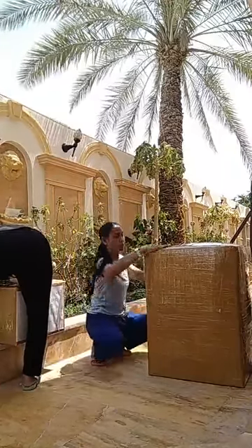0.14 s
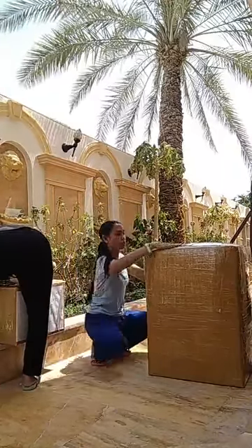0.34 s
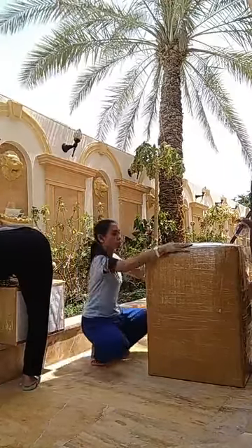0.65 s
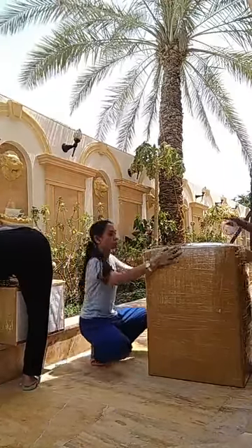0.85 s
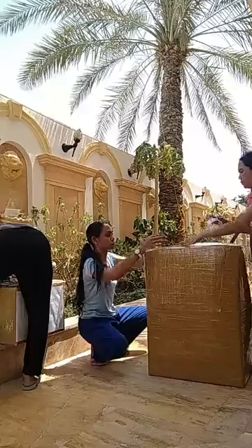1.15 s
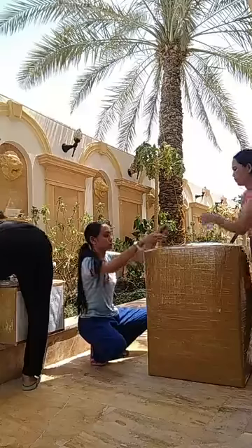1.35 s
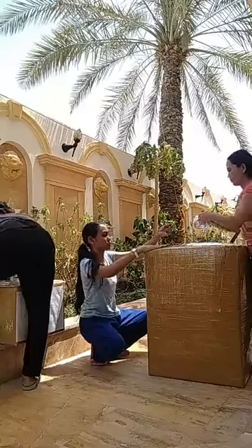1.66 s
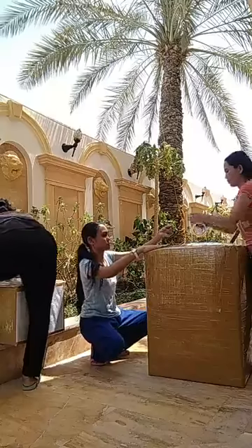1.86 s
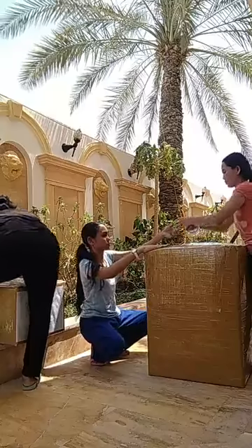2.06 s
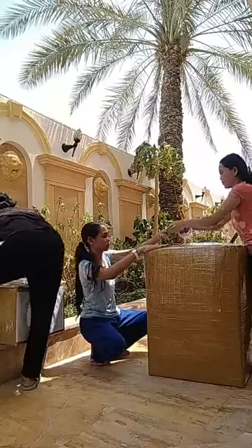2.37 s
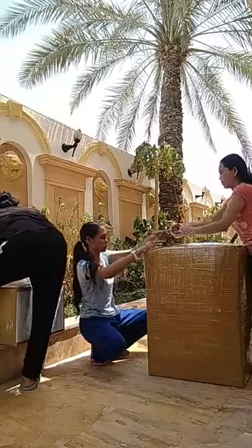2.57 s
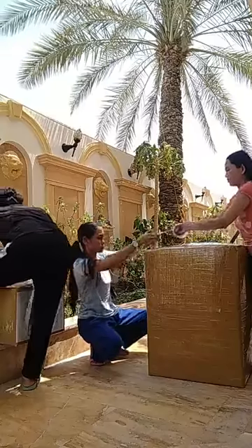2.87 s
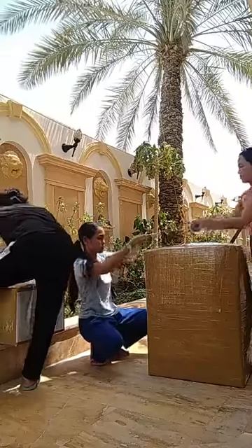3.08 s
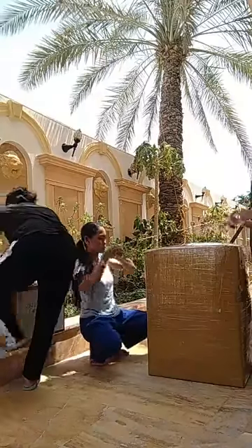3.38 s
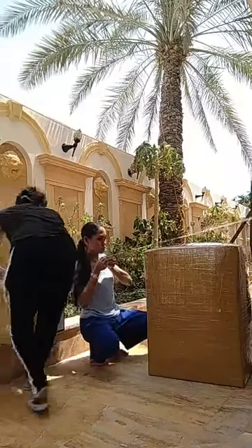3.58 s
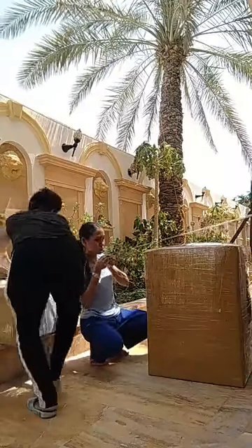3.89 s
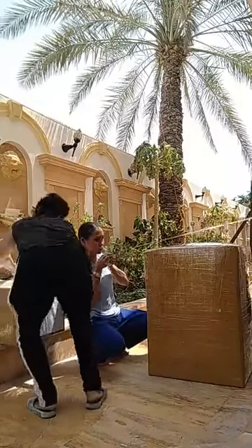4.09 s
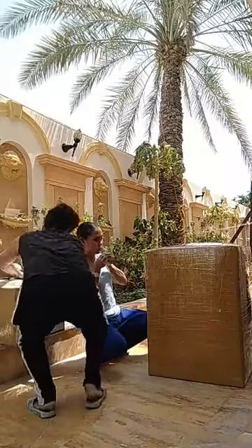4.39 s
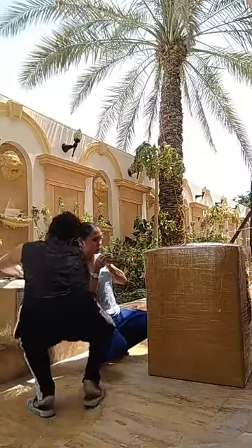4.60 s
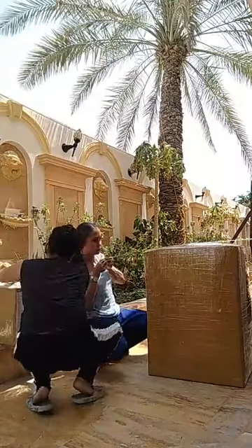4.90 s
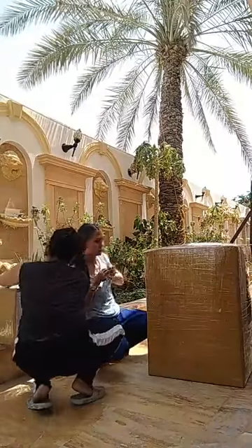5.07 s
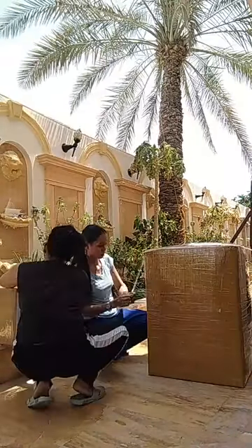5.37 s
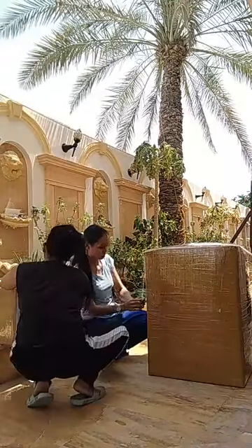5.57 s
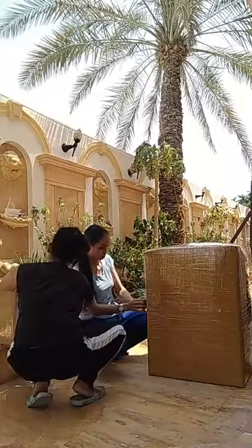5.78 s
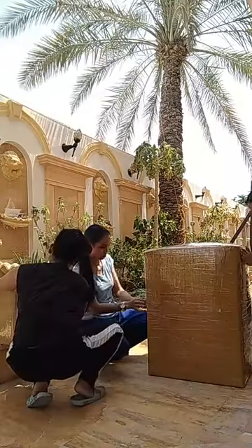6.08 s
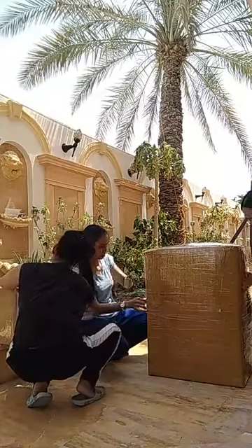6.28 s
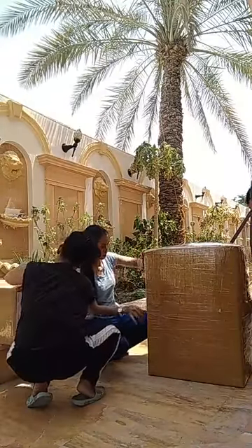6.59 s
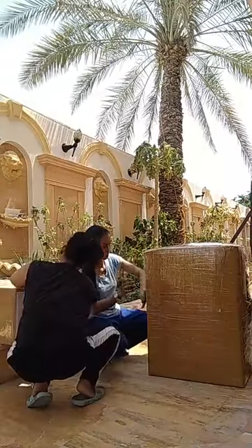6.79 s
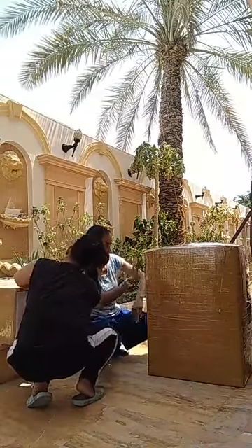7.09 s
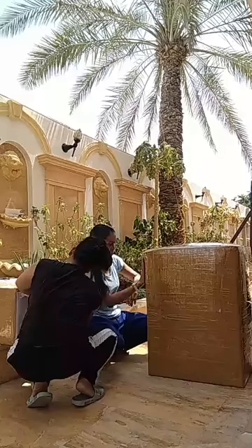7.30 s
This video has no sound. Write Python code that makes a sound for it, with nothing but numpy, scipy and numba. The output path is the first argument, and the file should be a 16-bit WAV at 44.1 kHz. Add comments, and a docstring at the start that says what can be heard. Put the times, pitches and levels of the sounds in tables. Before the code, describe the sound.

Hands rustle and skid over a big taped cardboard box in a walled courtyard, with small dry snaps. Around three seconds a sharp crack opens a loud, tearing pull of packing tape lasting over half a second. Crinkling follows, then a very short rising squeal and crisp snaps, and finally quieter rubbing with dull hollow knocks. Close microphone, short reverberation off paving and walls, faint low rumble, gated pauses.

```python
"""Packing tape and cardboard box

Packing tape is pulled off its roll beside a big taped cardboard box in a walled courtyard.
Random clicks of breaking glue ring the strip; a quick pull squeals on a rising note, and the tape is torn.
Around it film crinkles, snaps and squeaks in filtered grains, and hands rub, skid and knock on the box.
Low rumble lies underneath; a noise gate ducks the quiet moments and a faint hiss stays on top."""
import sys
import numpy as np
from scipy import signal
from scipy.fft import rfft, irfft
from scipy.io import wavfile
from scipy.ndimage import uniform_filter1d
from numba import njit

SR = 44100
rng = np.random.default_rng(int(sys.argv[2]) if len(sys.argv) > 2 else 0)


def to_wav(s):
    """Save 16-bit WAV."""
    ch = np.atleast_2d(s).T  # columns
    pcm = np.round(np.clip(ch, -1, 1) * 32767)  # PCM
    wavfile.write(sys.argv[1], SR, pcm.astype(np.int16))


N = 328545
T = np.arange(N) / SR


def undb(db):
    """Decibels to gain."""
    return 10 ** (np.asarray(db) / 20)


def unit(x):
    """Scale to rms 1."""
    return x / np.sqrt(np.mean(x ** 2))


def add(out, start_s, x):
    """Mix x in from start_s."""
    i = max(int(start_s * SR), 0)
    out[i:i + len(x)] += x[:N - i]


def colour(x, points):
    """Causal minimum-phase filter of unit energy, shaped through (frequency_hz, level_db) points."""
    hz, db = np.transpose(points)
    size = 4096
    grid_hz = np.maximum(np.arange(size // 2 + 1) * SR / size, 1)
    level_db = np.interp(np.log(grid_hz), np.log(hz), db)
    cepstrum = irfft(np.log(undb(level_db)))
    # folding the cepstrum forward puts the energy at the start
    cepstrum[1:size // 2] *= 2
    cepstrum[size // 2 + 1:] = 0
    response = irfft(np.exp(rfft(cepstrum)))
    return signal.fftconvolve(x, response / np.linalg.norm(response))[:len(x)]


@njit
def resonate(x, hz, q):
    """Band-pass with a moving centre: a state-variable filter with two memories."""
    y, band, low = np.empty(len(x)), 0., 0.
    for i in range(len(x)):
        g = np.tan(np.pi * hz[i] / SR)
        v = (band + g * (x[i] - low)) / (1 + g * (g + 1 / q))
        band, low, y[i] = 2 * v - band, low + 2 * g * v, v / q
    return y


def walk(rate):
    """Smooth random drift with spread 1, taking `rate` new values a second."""
    count = int(N / SR * rate) + 2
    drift = np.interp(T * rate, np.arange(count), rng.standard_normal(count))
    return drift * np.sqrt(1.5)  # makes up the spread lost between the points


def slips(rate, spread_db):
    """Tiny clicks at random moments (rate per second) and of uneven size, rms 1."""
    happen = rng.random(N) < rate / SR
    size = undb(spread_db * np.minimum(rng.exponential(size=N), 4))
    return unit(happen * size * np.sign(rng.standard_normal(N)))


def gesture(start_s, length_s, attack_s, release_s, fade_db=0, power=1):
    """Gain of one movement: it takes hold, fades (swells if fade_db is negative) and lets go."""
    t = np.maximum(T - start_s, 0)
    hold = undb(-fade_db * np.minimum(t / length_s, 1) ** power)
    release = np.exp(-np.clip((t - length_s) / release_s, 0, 20))
    return np.minimum(t / attack_s, 1) * hold * release


def shimmer(x, depth_db, rate, q=12, drift=0.085, count=13):
    """Shifting coloured grain: narrow bands a third-octave apart swell and drift at random, each on its own."""
    bands = 0
    for k, hz in enumerate(820 * 2 ** (np.arange(count) / 3)):
        band = resonate(x, hz * (1 + drift * walk(9)), q)
        bands = bands + band * (-1) ** k * undb(depth_db * walk(rate))
    return unit(bands)


def ringing(hz, q):
    """Friction noise caught by one steep, moving resonance, rms 1."""
    hz = np.clip(hz, 30, .44 * SR)
    caught = resonate(resonate(rng.standard_normal(N), hz, q), hz, q)
    return unit(caught / np.sqrt(hz))  # evens out the wider bands of high pitches


# colour of the outdoor rumble: frequency_hz, level_db
RUMBLE_COLOUR = [(25, -37), (45, -2), (62, 4.5), (105, 2), (170, -6), (300, -13.5), (900, -31), (2000, -50)]
# puffs of air that swell the rumble: start_s, length_s, rise_db
PUFFS = [(.79, 0.052, 5.5), (0.988, .37, 9.5), (4.793, 0.066, 9.5), (5.25, 0.3, 3.5), (6.722, .15, 3.5)]
PUFF_ATTACK_S, PUFF_RELEASE_S = 0.027, 0.057
RUMBLE_DB, RUMBLE_FLUTTER_DB = -63.5, 2.5


def rumble():
    """Low outdoor rumble: dark noise that flutters, and swells with each puff of air."""
    swell_db = sum(rise_db * gesture(start_s, length_s, PUFF_ATTACK_S, PUFF_RELEASE_S)
                   for start_s, length_s, rise_db in PUFFS)
    noise = unit(colour(rng.standard_normal(N), RUMBLE_COLOUR))
    return noise * undb(RUMBLE_DB + swell_db + RUMBLE_FLUTTER_DB * walk(12))


# strokes of the hands on film and cardboard: start_s, length_s, crinkle_db, rub_db
STROKES = [(0, 0.042, -35, -44), (0.044, 0.16, -44, -48), (0.463, 0.15, -50.5, -64.5),
           (0.595, 0.23, -50, -80), (0.762, .15, -47.5, -57.5), (0.983, .04, -52, -69),
           (1.026, 0.086, -47, -78), (1.129, 0.15, -47, -79), (1.518, 0.11, -43, -61),
           (1.64, 0.096, -46.5, -60), (1.867, 0.055, -46, -58.5), (2.147, 0.053, -46.5, -64),
           (2.22, 0.1, -49, -57.5), (2.274, 0.16, -39, -54.5), (2.421, 0.069, -32.5, -45.5),
           (2.515, 0.16, -49, -67), (2.735, 0.074, -49.5, -69.5), (3.762, 0.16, -33.5, -50.5),
           (3.913, 0.24, -37.5, -54), (4.184, .25, -39.5, -61.5), (4.432, 0.18, -41.5, -79),
           (4.579, 0.03, -34, -35.5), (4.723, 0.24, -40.5, -67), (4.843, 0.37, -37, -64),
           (5.053, 0.22, -39, -71), (5.162, 0.015, -26, -28.5), (5.288, 0.09, -46.5, -60),
           (5.397, .06, -43, -49.5), (5.457, 0.053, -40.5, -45.5), (5.519, 0.099, -47.5, -53),
           (5.771, 0.046, -43, -48.5), (5.824, 0.21, -47, -66), (6.049, 0.22, -45.5, -67),
           (6.18, 0.11, -52, -56), (6.344, 0.047, -43.5, -51.5), (6.411, 0.81, -48, -66.5),
           (6.702, 0.11, -40.5, -55.5), (6.839, 0.26, -46, -53.5), (6.986, .07, -38.5, -50),
           (7.085, 0.22, -48, -61.5), (7.266, 0.17, -43.5, -50.5)]
# colour of the crinkling film: frequency_hz, level_db
CRINKLE_COLOUR = [(1760, -48), (3000, -20.5), (3850, -10.5), (4730, -7.5), (5570, -7.5), (6980, -1),
                  (7700, -6), (9320, 2), (10500, -4), (11600, -6.5), (13700, -12), (14500, -36)]
# colour of the rubbing fingers: frequency_hz, level_db
RUB_COLOUR = [(700, -15.5), (1300, -5.5), (1900, 6), (3000, 5), (4200, 1.5), (7000, -34.5)]
STROKE_ATTACK_S, STROKE_RELEASE_S, STROKE_FADE_DB = 0.013, 0.037, 2.5


def handling(pressure_db=.8, shimmer_amount=0.67):
    """With each stroke film crinkles in fine grains over a soft hiss; fingers rub with a patchy, shifting colour."""
    grains = slips(rate=1200, spread_db=2) + rng.standard_normal(N)
    grains = unit(grains * undb(1.4 * walk(70)))
    grains = grains + shimmer_amount * shimmer(grains, depth_db=4, rate=16)
    drag = slips(rate=2500, spread_db=2) * undb(2 * walk(60))
    drag = shimmer(drag, depth_db=4.5, rate=25)
    crinkle, rub = 0, 0
    for start_s, length_s, crinkle_db, rub_db in STROKES:
        shape = gesture(start_s, length_s, STROKE_ATTACK_S, STROKE_RELEASE_S, STROKE_FADE_DB)
        # where strokes overlap, the louder one wins
        crinkle = np.maximum(crinkle, undb(crinkle_db) * shape)
        rub = np.maximum(rub, undb(rub_db) * shape)
    strokes = unit(colour(grains, CRINKLE_COLOUR)) * crinkle + unit(colour(drag, RUB_COLOUR)) * rub
    return strokes * undb(pressure_db * walk(22))


# squeaks of rubbed film: start_s, length_s, pitch_hz, level_db
SQUEAKS = [(0.026, 0.06, 1417, -50), (0.027, 0.055, 3090, -45.5), (0.118, 0.047, 1355, -48.5),
           (.14, 0.077, 2510, -47.5), (1.675, 0.085, 1934, -57.5), (4.848, 0.11, 4620, -44.5),
           (5.105, 0.048, 6900, -44), (5.397, 0.053, 1453, -49), (5.458, 0.042, 2086, -42),
           (5.835, 0.092, 8200, -44.5), (6.062, 0.11, 6500, -51), (7.182, 0.051, 2250, -49)]


def squeaks(width_hz_at_4k=170):
    """Film sticks and slips under the fingers: a hoarse note, rougher the higher it is."""
    out = np.zeros(N)
    for start_s, length_s, hz, db in SQUEAKS:
        t = T[:int(length_s * SR)]
        grip_hz = width_hz_at_4k * hz / 4000
        chance = rng.standard_normal(SR // 4) + 1j * rng.standard_normal(SR // 4)
        grip = signal.sosfilt(signal.butter(2, grip_hz, fs=SR, output="sos"), chance)
        grip = grip[::-1][:len(t)]  # the settled end of the filtered noise
        note = unit(np.real(grip * np.exp(2j * np.pi * hz * t)))
        add(out, start_s, undb(db) * np.sqrt(np.hanning(len(t))) * note)
    return out


# snaps and crunches of the film: start_s, treble_db, body_db (before the body trim), decay_s
SNAPS = [(0.027, -39, -37, 0.0064), (.135, -34, -51, .008), (0.235, -39, -38, 0.022),
         (0.283, -30.5, -34.5, 0.028), (0.311, -30, -44, 0.0021), (0.621, -29.5, -55, 0.0024),
         (0.631, -32.5, -42.5, 0.0033), (0.979, -32.5, -50, 0.0016), (1.327, -45.5, -54.5, 0.027),
         (1.483, -37, -61, 0.0039), (1.493, -42, -62, 0.0028), (1.526, -40, -56, .005),
         (1.607, -38, -53.5, .008), (1.879, -51, -68.5, 0.005), (2.171, -32.5, -51, 0.0053),
         (2.28, -29.5, -52, 0.0024), (2.315, -31.5, -50, 0.0027), (2.476, -24, -49, 0.002),
         (2.921, -19, -17, 0.0062), (3.008, -13, -6, 0.0015), (3.633, -24, -44, 0.0026),
         (3.663, -23, -31, 0.0036), (4.07, -18.5, -35, 0.0039), (4.08, -19, -26.5, 0.003),
         (4.587, -30.5, -22, 0.0098), (4.975, -24.5, -59.5, 0.0054), (4.986, -15.5, -27.5, 0.003),
         (4.997, -15, -23, 0.005), (5.176, -22, -19.5, 0.0041), (5.956, -35, -38.5, 0.0086),
         (6.207, -38, -58, 0.023), (6.326, -32, -49, 0.0035), (6.336, -32, -53, 0.0044),
         (6.699, -35, -49, 0.013), (6.92, -36.5, -40, 0.0076), (7.247, -27.5, -42, 0.004)]
# colour of the bright crack: frequency_hz, level_db
CRACK_COLOUR = [(1500, -63), (3500, -3), (6500, 1), (9200, 8.5), (10500, 2), (14000, -7)]
# colour of the body under the crack: frequency_hz, level_db
SNAP_BODY_COLOUR = [(200, -26), (600, -0.5), (1000, -5), (2000, 2.5), (3500, -6.5), (7000, -8.5)]


def snaps(tail_s=0.021, tail_db=-19, grit=0.32, body_trim_db=-7):
    """A crease flips with a sharp crack or a longer crunch, then the film shivers briefly."""
    t = T[:SR // 10]
    grains = unit(slips(rate=3200, spread_db=1) * grit + 0.8 * rng.standard_normal(N))
    bright, body = np.zeros(N), np.zeros(N)
    for start_s, treble_db, body_db, decay_s in SNAPS:
        shape = np.exp(-t / decay_s) + undb(tail_db) * np.exp(-t / tail_s)
        crack = grains[int(start_s * SR):][:len(t)] * shape
        add(bright, start_s, crack * undb(treble_db))
        add(body, start_s, crack * undb(body_db))
    return colour(bright, CRACK_COLOUR) + undb(body_trim_db) * colour(body, SNAP_BODY_COLOUR)


# skids of a hand landing on the taped lid: start_s, length_s, level_db
SKIDS = [(.28, 0.048, -28.5), (.34, 0.048, -35.5), (0.387, 0.023, -32), (0.448, .022, -31)]
# colour of the zip over glossy tape: frequency_hz, level_db
SKID_COLOUR = [(700, -27), (1500, -14), (4000, -13), (6500, -5.5), (8500, 4), (10500, 6.5), (14000, -1.5)]
SKID_ATTACK_S, SKID_RELEASE_S = 0.0093, 0.019


def skid():
    """Skin judders over glossy tape with a thin, very bright zip."""
    judder = unit(slips(rate=6200, spread_db=-1.5) * undb(2 * walk(330)))
    pressure = sum(undb(db) * gesture(start_s, length_s, SKID_ATTACK_S, SKID_RELEASE_S)
                   for start_s, length_s, db in SKIDS)
    return unit(colour(judder, SKID_COLOUR)) * pressure


# palms sliding over the hollow box: start_s, length_s, level_db, resonance_hz of the touched spot
SLIDES = [(0.285, .028, -42, 253), (.34, 0.13, -64, 746), (.79, .11, -74, 590), (0.979, .04, -70.5, 643),
          (1.156, 0.22, -78, 436), (1.886, 0.053, -68.5, 467), (2.331, .08, -67.5, 280),
          (2.452, .08, -56.5, 673), (2.555, .13, -70.5, 350), (5.971, 0.035, -63, 426),
          (6.119, 0.065, -66.5, 1050), (6.167, 0.2, -71, 390), (6.361, 0.079, -69.5, 1060),
          (6.53, .06, -64, 590), (6.69, 0.12, -55, 720), (6.828, 0.078, -54, 324),
          (6.91, 0.075, -58.5, 665), (7.004, 0.031, -54.5, 303), (7.065, 0.24, -84, 1100),
          (7.356, .1, -51.5, 349)]
# colour of the hollow body: frequency_hz, level_db
BOX_COLOUR = [(120, -18.5), (250, 4.5), (400, 2.5), (600, -16), (850, 0.5), (1200, -13), (2200, -22.5)]
SLIDE_ATTACK_S, SLIDE_RELEASE_S = 0.017, 0.017


def sliding(q=3, upper=2.3, upper_db=-9, broad_db=-4):
    """Palms drag from spot to spot; each wakes its own panel note and the hollow body."""
    starts, _, _, hz = np.transpose(SLIDES)
    stepped_hz = hz[np.searchsorted(starts[1:], T)]
    spot_hz = uniform_filter1d(stepped_hz, SR // 80) * (1 + 0.07 * walk(60))
    panel = ringing(spot_hz, q) + undb(upper_db) * ringing(upper * spot_hz, q)
    hollow = unit(colour(slips(rate=630, spread_db=8.5), BOX_COLOUR))
    pressure = sum(undb(db) * gesture(start_s, length_s, SLIDE_ATTACK_S, SLIDE_RELEASE_S)
                   for start_s, length_s, db, _ in SLIDES)
    return (panel + undb(broad_db) * hollow) * pressure


# knocks on cardboard and paving: start_s, level_db (before the bass cut and trim), pitch_hz
KNOCKS = [(0.294, -31.5, 259), (1.347, -52.5, 450), (1.88, -52, 506), (2.428, -49, 370), (2.479, -49, 730),
          (5.963, -46, 410), (6.124, -51, 1088), (6.246, -49, 345), (6.278, -45.5, 428),
          (6.366, -44.5, 931), (6.674, -48, 424), (6.712, -48, 972), (6.949, -44.5, 768), (7.019, -40, 283),
          (7.14, -43.5, 230), (7.245, -40.5, 1086), (7.341, -44.5, 600), (7.397, -39.5, 666),
          (7.419, -43, 483)]
# modes of a struck panel: multiple of its pitch, level_db, t60_s
PANEL_MODES = [(1, 3, 0.085), (1.22, -16.5, 0.066), (1.7, -11, 0.06), (2.9, -10, 0.031)]


def knocks(contact_s=0.0055, scrape=0.3, trim_db=2):
    """Soft, scraping blows ring a few damped panel modes."""
    t, out = T[:SR // 4], np.zeros(N)
    for start_s, db, hz in KNOCKS:
        push = scrape * rng.standard_normal(len(t)) * np.exp(-t / contact_s)
        push[0] += 2
        ring = sum(undb(mode_db - 60 * t / t60_s) * np.sin(2 * np.pi * multiple * hz * t)
                   for multiple, mode_db, t60_s in PANEL_MODES)
        blow = signal.fftconvolve(push, ring)[:len(t)]
        add(out, start_s, blow / np.abs(blow).max() * undb(db))
    # a light panel radiates no deep bass
    bass_cut = signal.butter(4, 170, "high", fs=SR, output="sos")
    return signal.sosfilt(bass_cut, out) * undb(trim_db)


# pulls on the tape: start_s, length_s, crackle_db, drone_db of the strip, fade_db (negative swells)
PULLS = [(2.802, 0.045, -21, -37.5, -2.7), (2.903, .6, -19.5, -29.5, 9.5), (3.592, 0.096, -31.5, -45.5, 1),
         (3.717, 0.05, -38.5, -61, 4), (4.581, 0.086, -27.5, -41, 16.5), (5.161, 0.021, -28.5, -47, 5.5)]
# lowest mode of the free strip, sinking at first as it gets longer, later rising: time_s, pitch_hz
STRIP_PITCH = [(2.81, 524), (2.85, 417), (2.93, 320), (3.07, 318), (3.3, 225), (3.38, 161), (3.52, 239),
               (3.68, 279), (4.6, 297), (5.18, 458)]
# modes of the strip: multiple of the lowest, level_db
STRIP_MODES = [(1, 8), (1.9, 5), (2.8, 3), (4.098, 1.5)]
# colour of the peeling crackle: frequency_hz, level_db
PEEL_COLOUR = [(590, -31.5), (1000, -13), (1210, -16), (1580, -9.5), (1760, -9), (2200, -10), (2490, -7.5),
               (2840, -4.5), (3870, -7), (6980, -4), (9010, 0), (9630, 3), (10500, -3), (14200, -12.5)]
# colour of the strip's drone: frequency_hz, level_db
DRONE_COLOUR = [(100, -0.5), (300, 3.5), (800, 8.5), (1200, -0.5), (2000, -25.5), (5000, -44)]
PULL_ATTACK_S, PULL_RELEASE_S = 0.011, 0.03
ARM_SLOWING = 3.05  # power of time: the crackle keeps its level until late in the pull


def peel(q=3.13, drone_slowing=0.91, shimmer_amount=0.29):
    """Glue threads break in a dense, catching stream; the clicks sound directly and ring the taut strip."""
    catching = undb(1.4 * walk(420) + .6 * walk(45))
    breaks = unit(slips(rate=8000, spread_db=1.2) * catching)
    lowest_hz = np.interp(T, *np.transpose(STRIP_PITCH)) * (1 + 0.061 * walk(40))
    strip = 0
    for multiple, db in STRIP_MODES:
        mode_hz = multiple * lowest_hz
        strip = strip + undb(db) * resonate(resonate(breaks, mode_hz, q), mode_hz, q)
    film = breaks + shimmer_amount * shimmer(breaks, depth_db=5, rate=30)
    crackle, drone = 0, 0
    for start_s, length_s, crackle_db, drone_db, fade_db in PULLS:
        pull = (start_s, length_s, PULL_ATTACK_S, PULL_RELEASE_S, fade_db)
        crackle = crackle + undb(crackle_db) * gesture(*pull, ARM_SLOWING)
        drone = drone + undb(drone_db) * gesture(*pull, drone_slowing)
    return unit(colour(film, PEEL_COLOUR)) * crackle + unit(colour(strip, DRONE_COLOUR)) * drone


# the quick pull: its slip rate runs up toward a top speed, and it gets louder with speed
SQUEAL_S, SQUEAL_LENGTH_S, SQUEAL_DB = 4.596, 0.087, -30.5
SQUEAL_START_HZ, SQUEAL_TOP_HZ, RUN_UP_S, SQUEAL_DB_PER_OCTAVE = 1850, 4160, 0.023, 9.5


def squeal(jitter=0.06, second_db=-2, third_db=-12, attack_s=.004, release_s=0.02):
    """Pulled fast, the slips fall roughly into step and give a hoarse rising note."""
    run_up = np.exp(-np.maximum(T - SQUEAL_S, 0) / RUN_UP_S)
    hz = SQUEAL_TOP_HZ - (SQUEAL_TOP_HZ - SQUEAL_START_HZ) * run_up
    phase = 2 * np.pi * np.cumsum(hz * (1 + jitter * walk(1500))) / SR
    tone = np.sin(phase) + undb(second_db) * np.sin(2 * phase) + undb(third_db) * np.sin(3 * phase)
    hoarse = unit(tone * undb(2.9 * walk(500)))
    gain = undb(SQUEAL_DB + SQUEAL_DB_PER_OCTAVE * np.log2(hz / SQUEAL_TOP_HZ))
    return hoarse * gain * gesture(SQUEAL_S, SQUEAL_LENGTH_S, attack_s, release_s)


def courtyard(x, t60_s=0.43, treble_t60_s=0.24, wet_db=-7, first_s=0.0049):
    """Paving and walls scatter a short tail whose treble dies first."""
    t = T[:SR * 3 // 4]
    noise = rng.standard_normal(len(t))
    low = signal.sosfilt(signal.butter(2, 4000, fs=SR, output="sos"), noise)
    high = signal.sosfilt(signal.butter(2, 4000, "high", fs=SR, output="sos"), noise)
    tail = low * 1000 ** (-t / t60_s) + high * 1000 ** (-t / treble_t60_s)
    tail = tail * (t > first_s)  # silence until the first reflection
    return x + undb(wet_db) * signal.fftconvolve(x, tail / np.linalg.norm(tail))[:N]


def scene():
    """All the handling in the courtyard over a low outdoor rumble, the same in both ears."""
    near = courtyard(handling() + squeaks() + snaps() + skid() + sliding() + knocks() + peel())
    # the squeal carries to the walls and lingers
    far = courtyard(squeal(), t60_s=0.42, treble_t60_s=0.29, wet_db=2.5)
    mono = near + far + rumble()
    return np.array([mono, mono])


# noise gate: treble level at which it is fully open, dB shut per dB below that, deepest cut
GATE_DB, GATE_SLOPE, GATE_DEPTH_DB = -54.5, 1.37, 20


def gate(x, key_hz=3000, window_s=0.03):
    """A noise gate turns the whole mix down whenever its treble falls quiet."""
    window = int(window_s * SR)
    treble = signal.sosfilt(signal.butter(2, key_hz, "high", fs=SR, output="sos"), x)
    power = uniform_filter1d(treble ** 2, window)
    level_db = 10 * np.log10(np.maximum(power, 1e-12))
    cut_db = np.clip(GATE_SLOPE * (GATE_DB - level_db), 0, GATE_DEPTH_DB)
    return x * uniform_filter1d(undb(-cut_db), window)


# colour of the faint hiss: frequency_hz, level_db
HISS_COLOUR = [(15, -30), (25, 1), (71, -4.5), (166, -10.5), (697, -5.5), (1320, -35), (3180, -53),
               (4260, -31.5), (7860, -10.5), (13000, -41), (14500, -45)]
HISS_DB, TOP_HZ = -77.5, 14350


def record(dry):
    """The gate ducks the pauses, a steady faint hiss is added, and a steep low-pass cuts the top."""
    hiss = unit(colour(rng.standard_normal(N), HISS_COLOUR)) * undb(HISS_DB)
    top_cut = signal.ellip(10, .2, 75, TOP_HZ, fs=SR, output="sos")
    return signal.sosfilt(top_cut, gate(dry) + hiss)


dry = scene()
out = record(dry)
to_wav(out)
```